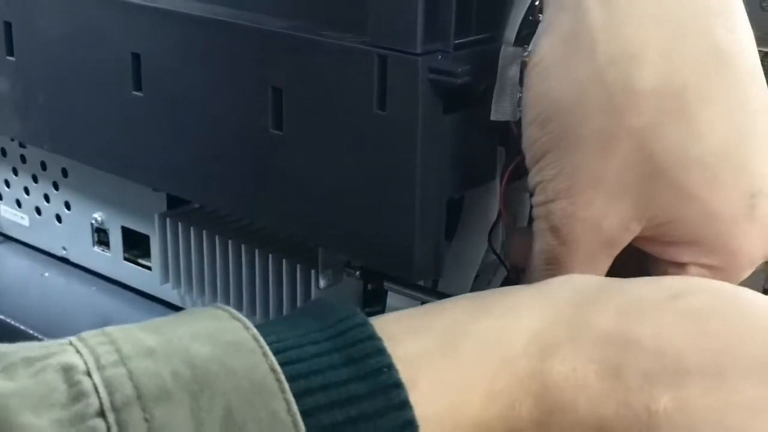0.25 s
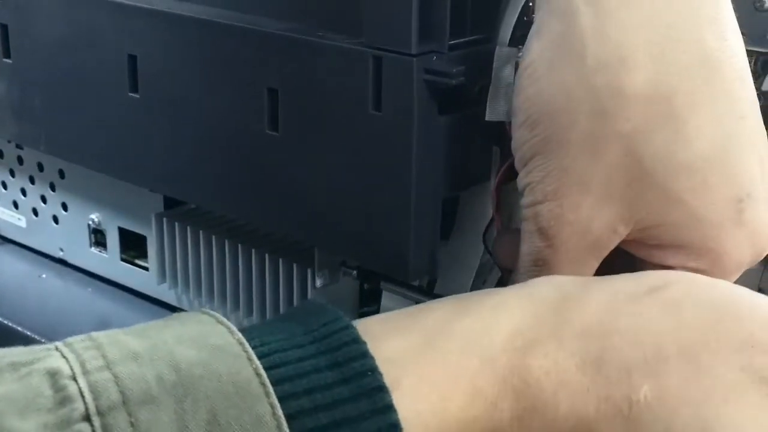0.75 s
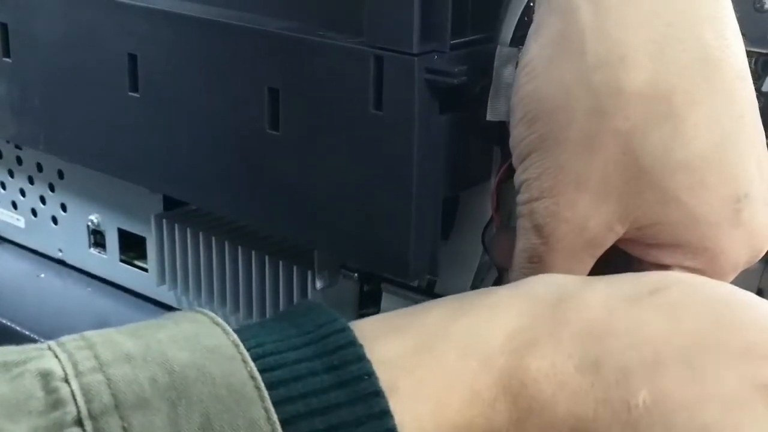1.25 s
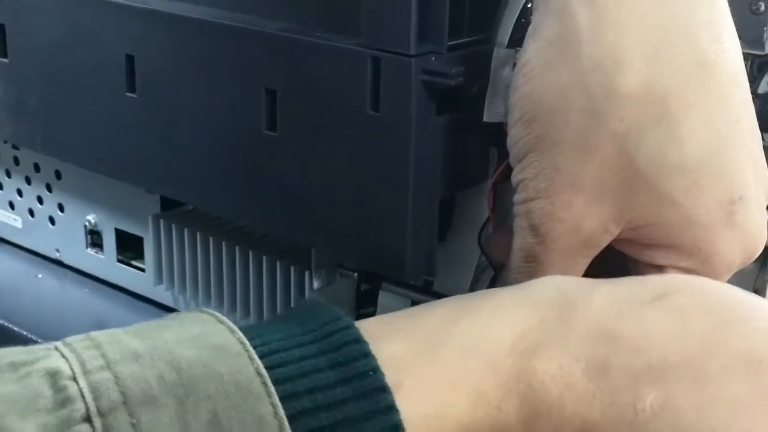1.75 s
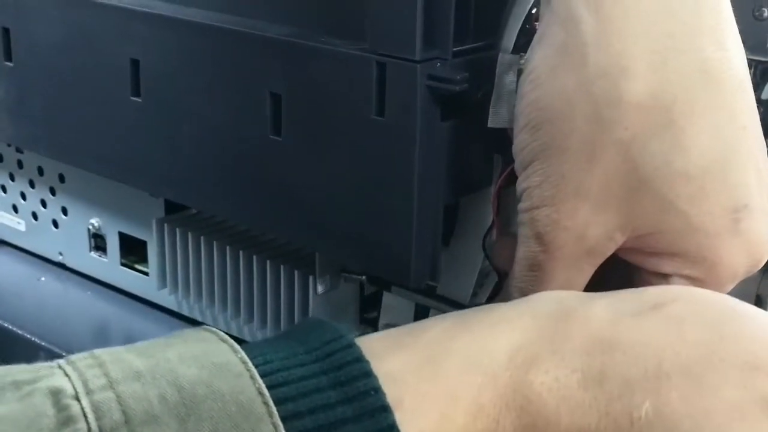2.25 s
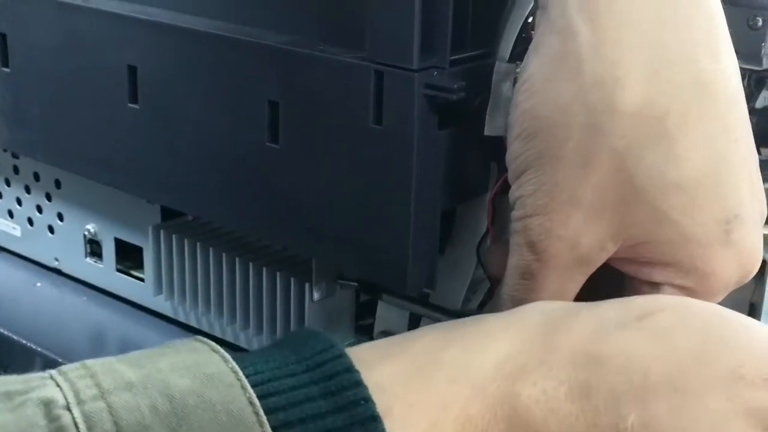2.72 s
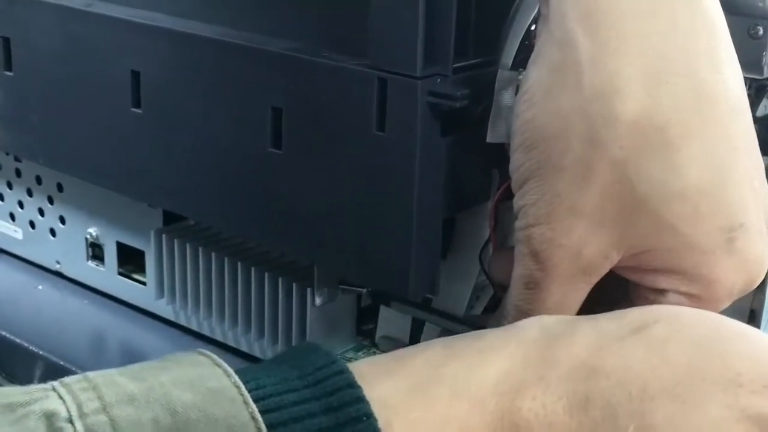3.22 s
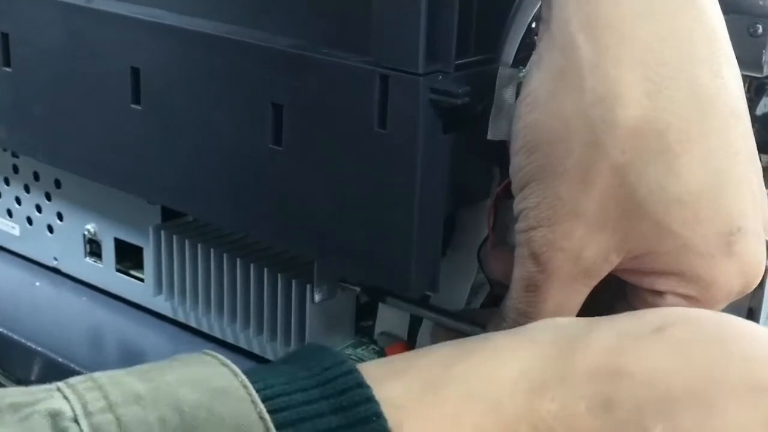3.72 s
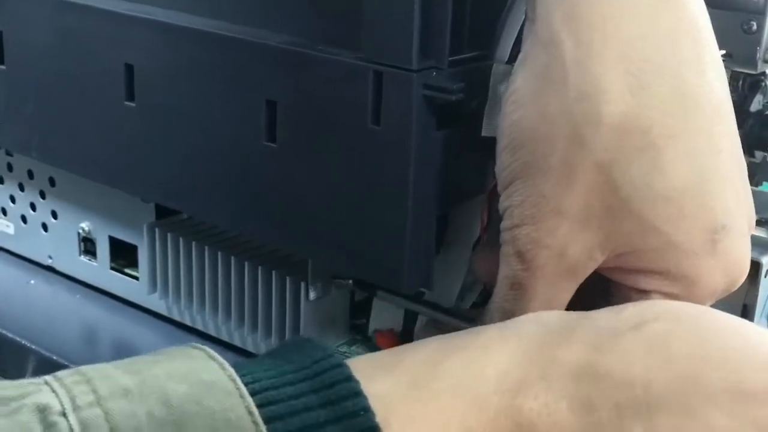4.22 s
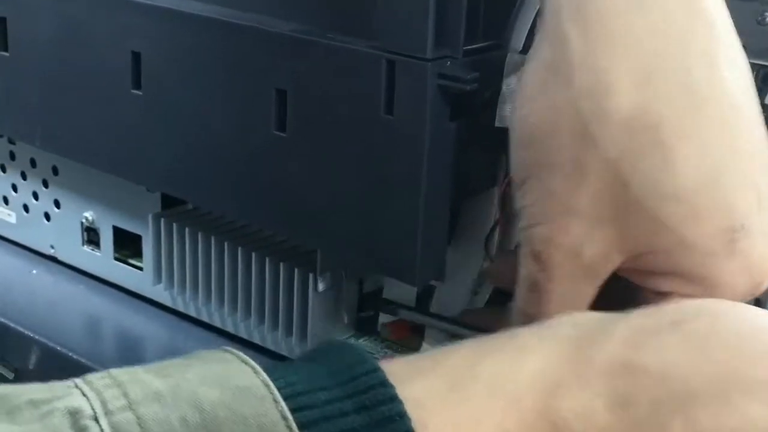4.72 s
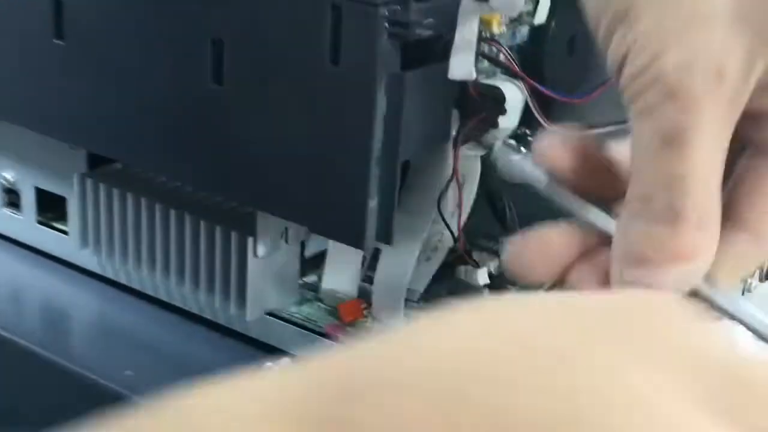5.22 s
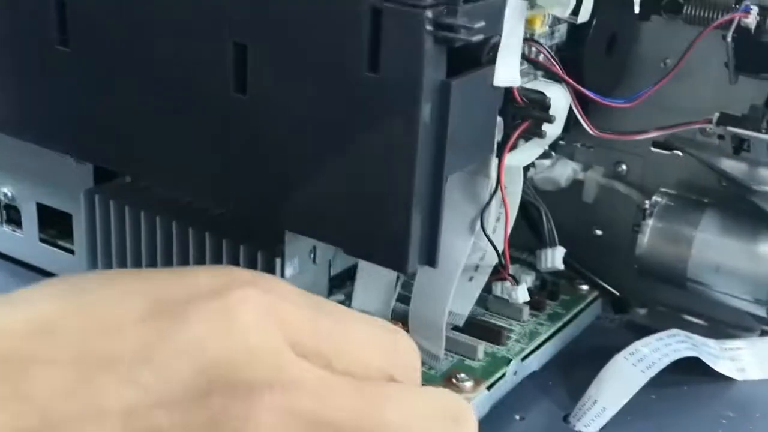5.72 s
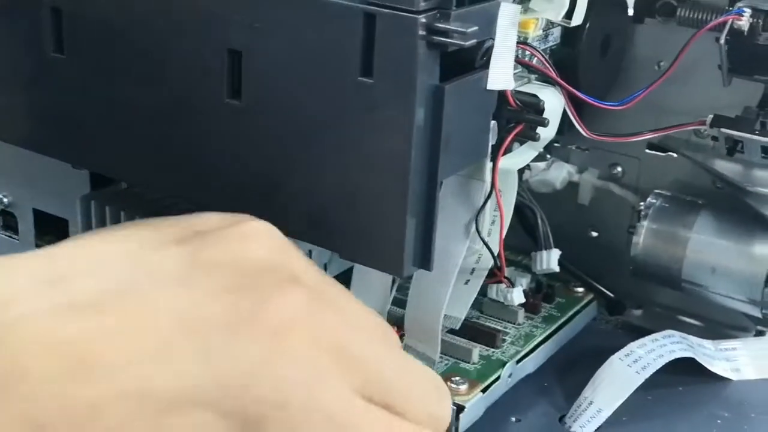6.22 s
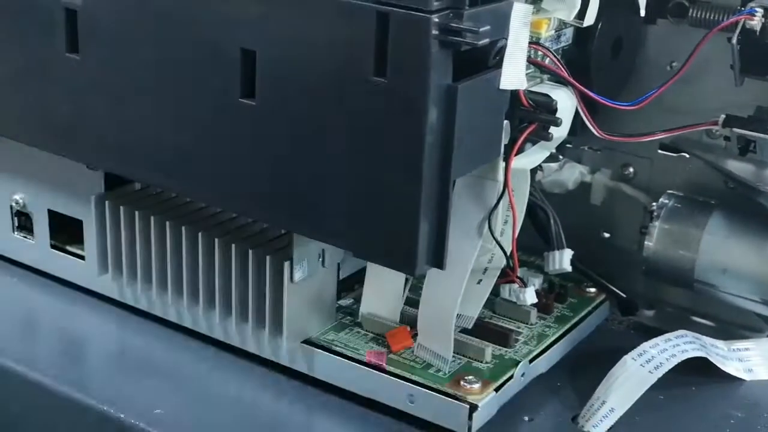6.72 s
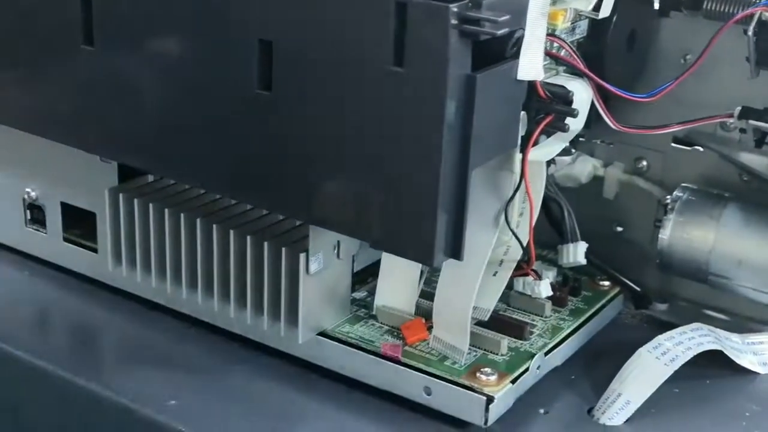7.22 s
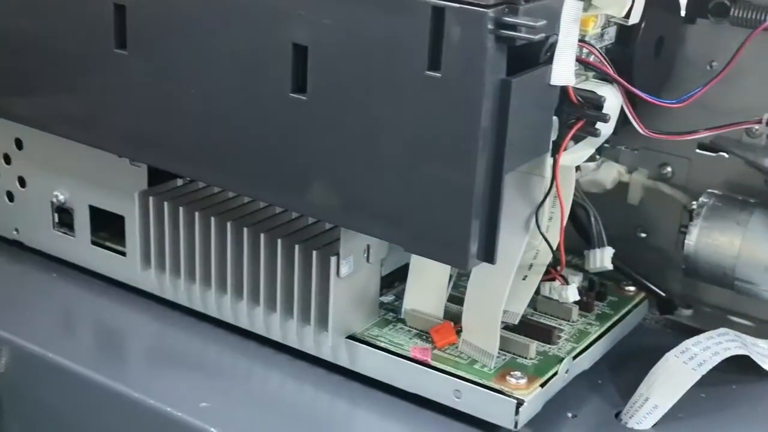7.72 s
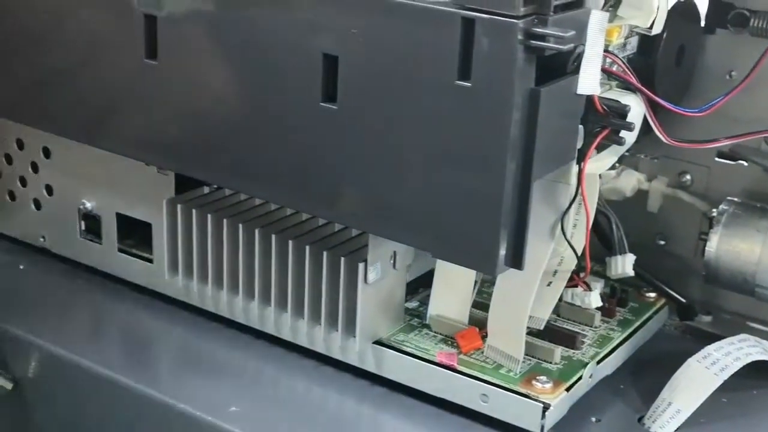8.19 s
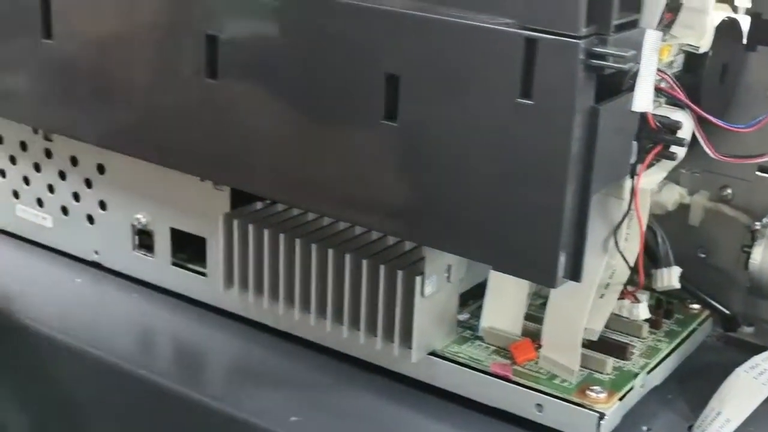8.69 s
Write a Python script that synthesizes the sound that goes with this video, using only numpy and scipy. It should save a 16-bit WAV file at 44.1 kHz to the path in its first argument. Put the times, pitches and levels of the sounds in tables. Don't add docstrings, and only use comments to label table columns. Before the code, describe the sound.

Soft rubbing and tiny screwdriver ticks on sheet steel, then a sharp metallic shaft rattle, a loud tool drop on a bench and a brief tray clatter.

```python
import sys
import numpy as np
from scipy import signal
from scipy.fft import rfft, irfft, next_fast_len
from scipy.io import wavfile
from scipy.ndimage import map_coordinates

SR = 44100
rng = np.random.default_rng(int(sys.argv[2]) if len(sys.argv) > 2 else 0)


def how_loud(loudness_db):
    steps = np.asarray(loudness_db, float) / 20
    return 10 ** steps


def persist_wave(psi):
    counts = np.round(np.clip(psi, -1, 1) * 32767).astype(np.int16)
    wavfile.write(sys.argv[1], SR, np.atleast_2d(counts).T)


N = 394694
SIZE = 2 ** 15
HZ = np.fft.rfftfreq(SIZE, 1 / SR)
T = np.arange(SIZE) / SR

# start_s, peak_level_db, panel_knock_db, steel_brightness_db, strongest_ring_hz
TIP_TICKS = [(1.6511, -48.5, -15.5, -0.5, 2160), (1.6826, -48, -37, -2.5, 2250),
             (1.707, -52.5, -31.5, -5.5, 2270), (1.734, -46, -13.5, -7.5, 2670),
             (2.0792, -51, -18.5, -14, 2580), (2.2435, -36.5, -20.5, -21.5, 1670),
             (2.335, -44.5, -22, -15, 1660), (2.4547, -43.5, -20.5, 3.5, 2400),
             (2.5041, -44.5, -22.5, -20, 2450), (2.6771, -33, -28, -10.5, 2190),
             (2.7211, -40, -21, -43, 1750), (3.2222, -40.5, -32, -18.5, 2350),
             (3.4232, -46, -17.5, -3.5, 1750), (3.492, -44.5, -34, -20.5, 2630),
             (3.5235, -41.5, -21, -18, 2700), (3.6848, -26, -15.5, -6.5, 2900),
             (4.0915, -34.5, -32.5, -15, 2600), (4.0985, -28, -21.5, -3.5, 2800),
             (4.129, -39.5, -9, -47, 2380), (4.3042, -45.5, -22.5, -5.5, 7300),
             (4.352, -44.5, -21, -16, 2400), (4.364, -32, -22, -10, 1800), (4.3846, -35, -12, -13, 2600),
             (4.6856, -45.5, -20.5, -16, 2670)]
# start_s, peak_level_db, panel_knock_db, steel_brightness_db, strongest_ring_hz
FINGER_TICKS = [(5.8719, -46, -35, -21, 2800), (6.1437, -36, -23, -5, 1950),
                (6.1521, -30, -28.5, -0.5, 2250), (7.428, -50.5, -13, -32.5, 2150),
                (7.5537, -50, -32, -17.5, 1780), (7.7706, -39.5, -38, -20.5, 3000)]
# start_s, peak_level_db, steel_brightness_db, strongest_ring_hz
THREAD_SLIPS = [(0.223, -54.5, -30.5, 850), (0.3368, -82, -29, 872), (0.354, -47.5, -28.5, 1600),
                (0.716, -53, -26.5, 1600), (0.747, -56, -18, 1700), (1.111, -49, -24, 1650),
                (1.128, -49.5, -32, 1690), (1.4892, -55.5, -15, 2470), (1.786, -52.5, -15, 2380),
                (1.8198, -52.5, -7, 2470), (2.153, -51.5, -17, 2460), (2.2227, -45.5, -17.5, 2520),
                (3.0464, -55.5, -31, 2150), (3.0621, -38.5, -11.5, 2540), (5.889, -47, -20.5, 2580)]
# start_s, peak_level_db, panel_knock_db, steel_brightness_db, strongest_ring_hz
SHAFT_RATTLE = [(4.7518, -44, -24, -17.5, 1850), (4.7656, -31.5, -36, -20.5, 1810),
                (4.7886, -41.5, -33, -16, 2520), (4.8115, -34, -38.5, -9.5, 2230),
                (4.846, -39, -22.5, -14, 4140), (4.8591, -44.5, -19.5, -15, 2100),
                (4.9212, -30.5, -35, -0.5, 7650), (4.9488, -16, -40, 1, 7600),
                (4.9513, -13, -40.5, 0, 7050), (5.0112, -23.5, -38, -5.5, 2730),
                (5.0425, -28.5, -39, -9.5, 4350), (5.0531, -17, -50, 0, 2470),
                (5.1018, -8.5, -31, -2.5, 1740), (5.142, -26, -30, -1, 2630),
                (5.1485, -17.5, -28.5, -2, 7850), (5.1749, -21.5, -33.5, -3, 1940),
                (5.1898, -32.5, -36, 4, 3000), (5.3296, -36, -18, -26, 2170),
                (5.3672, -37.5, -29.5, -17.5, 1950), (5.404, -38.5, -29, -14.5, 2100)]
# start_s, peak_level_db, panel_knock_db, steel_brightness_db, strongest_ring_hz
SHAFT_EXIT = [
    (5.2725, -16, -27, 0, 2580),
    (5.2862, -18.5, -11.5, -3, 2680),
]
# start_s, peak_level_db, panel_knock_db, steel_brightness_db, strongest_ring_hz
TOOL_DROP = [
    (7.9486, -8, 0, 0, 1860),
]
# delay_s, level_db
DROP_BOUNCES = [(0, -3), (.0006, -8), (.0032, 0), (.0043, -4), (.0066, -2), (.0095, -9), (.033, -9)]
# start_s, peak_level_db, panel_knock_db, steel_brightness_db, buzz_t60_s
TRAY_CLATTER = [(8.3473, -24.5, -18, -13, 0.23), (8.3788, -30.5, -24, -18.5, 0.036),
                (8.433, -34.5, -13, -19, 0.33), (8.4551, -30.5, -14.5, -36, 0.065),
                (8.483, -19, -8, -11.5, 0.078), (8.6029, -17.5, -24.5, -18.5, 0.11),
                (8.639, -34, -24, -36, 0.23), (8.702, -44, -23.5, -24.5, 0.33),
                (8.772, -51, -24, -10, 0.033)]

# frequency_hz, level_db (per Hz)
CHASSIS_COLOUR = [(240, -26), (400, -16.5), (994, -6.5), (1200, -7.5), (1400, -3.5), (1820, 3), (2090, -3),
                  (2670, -2.5), (3310, -7), (5030, -8), (7630, -11.5), (8760, -23.5), (14600, -44),
                  (16000, -56)]
# frequency_hz, width_hz, level_db
CHASSIS_RESONANCES = [(1200, 102, 9.5), (1606, 155, 1.5), (2540, 470, 7.5), (3996, 530, 6.5),
                      (7710, 670, 8)]
# frequency_hz, level_db (per Hz)
SHAFT_COLOUR = [(240, -76.5), (400, -20), (935, -11), (1030, -6), (1180, -8), (1870, 1), (2630, -0.5),
                (3470, -4), (6850, -5.5), (7630, -6.5), (10200, -30.5), (13700, -42), (15300, -42),
                (16000, -64)]
# frequency_hz, width_hz, level_db
SHAFT_RESONANCES = [(2700, 300, 3.12), (7650, 500, 2.4), (13200, 3870, 15.8)]
# frequency_hz, level_db, t60_s
SHAFT_RINGING = [(1780, -5.5, 0.094), (2600, -3, 0.2), (4330, -9.5, 0.083), (4440, -19.5, 0.14),
                 (5740, -9.5, 0.13), (8160, -19.5, 0.134)]
# frequency_hz, level_db (per Hz)
BENCH_COLOUR = [(240, -31.5), (400, -13.5), (490, -32), (626, -11), (893, -17), (1760, -4), (2930, -5),
                (3650, -13.5), (4300, -22), (5500, -26.5), (7800, -31), (10000, -67), (16000, -70.5)]
# frequency_hz, width_hz, level_db
BENCH_RESONANCES = [(1193, 15, 4), (1488, 47, 7.5), (1660, 50, -5), (1824, 74, 10), (2194, 115, 12),
                    (2380, 35, -1.5), (2600, 140, 9), (2920, 63, 5), (3110, 44, -1.5), (3320, 65, 4),
                    (3570, 50, 2.5), (3670, 60, 6), (3870, 34, -3), (4040, 72, -0.5)]
# pitch_hz, level_db
BENCH_NOTES = [(760, -47.5), (1167, -38), (1486, -49.5), (1763, -42), (1810, -34.5), (2152, -38.5),
               (2192, -45), (2505, -42), (2589, -41.5), (2910, -43), (2945, -43.5), (3343, -49),
               (3690, -48), (4020, -52.5)]
# frequency_hz, level_db (per Hz)
TRAY_COLOUR = [(180, -28), (300, -10.5), (634, -17), (1030, -8), (1390, -6), (1900, -10), (2170, -6),
               (2480, -6.5), (3350, -11.5), (7440, -14.5), (9390, -35.5), (14500, -58), (16000, -45.5)]
# frequency_hz, width_hz, level_db
TRAY_RESONANCES = [(1048, 23, 7.1), (1627, 125, 7.5), (1915, 32, 8.1), (2450, 170, 6.1), (2150, 82, 2.7),
                   (4240, 550, 3.4)]
# start_s, peak_level_db, pitch_hz, t60_s
FREE_RINGS = [(2.503, -57, 4300, .12), (3.188, -52, 2400, 0.1), (3.685, -41, 4300, .06),
              (4.092, -39, 4230, .06), (4.098, -37, 4230, .07), (2.243, -45, 1600, .08),
              (2.243, -46, 2500, .06), (2.678, -47, 4250, .05), (4.921, -38, 2500, .14),
              (4.921, -37, 7650, .09), (4.921, -52, 14500, .05), (4.845, -40, 4230, 0.08),
              (4.92, -41, 9650, 0.16), (4.953, -36, 5950, .3), (4.953, -35, 4350, .2),
              (5.103, -33, 6420, .06), (5.04, -38, 4350, .3), (8.347, -43, 7450, .12),
              (5.038, -37, 9640, 0.1), (4.952, -42, 4635, .5), (5.874, -64, 4635, 0.55),
              (6.151, -60, 2914, 0.9), (6.155, -50, 2320, 0.2), (8.483, -29, 5320, 0.035),
              (5.286, -27, 5130, .035), (8.347, -37, 2450, .08), (8.453, -38, 1730, .1),
              (8.603, -29, 1900, .1), (8.64, -36, 1720, .15)]
# start_s, peak_level_db, pitch_hz
HAND_THUDS = [(1.142, -56, 109), (4.133, -43.5, 109), (4.399, -45.5, 151), (4.977, -44.5, 125),
              (5.048, -41.5, 118), (5.1, -42.5, 188), (5.291, -41.5, 220.7), (5.358, -44, 187),
              (6.17, -49, 143.9), (7.59, -39, 203.3), (7.692, -47, 200.6), (7.967, -34.5, 204.4),
              (8.058, -40, 107), (8.373, -40.5, 214), (8.459, -41, 127), (8.548, -43.5, 216.5),
              (8.697, -45.5, 97.7)]
# frequency_hz, level_db
CASE_BOOM = [(60, -29.5), (200, 8), (320, 0.5), (480, -15), (900, -46.5)]

# full_from_s, hold_s, swell_s (per 20 dB), body_level_db, hiss_level_db
RUB_STROKES = [(0, 0.043, -1.5, -60, -82), (.25, 0.12, 0.2, -64.5, -95), (.65, 0.13, -0.2, -66.5, -87),
               (1.48, 0.019, 5.5, -68.5, -82.5), (1.74, .14, -2.15, -66.5, -79),
               (5.86, 0.046, 0.95, -67.5, -78), (6.57, 0.073, 0.05, -66.5, -55),
               (6.8, 0.12, 2.9, -90, -71.5), (7.35, 0.06, 0.31, -67.5, -65.5)]
# frequency_hz, width_hz, level_db
RUB_BODY_BANDS = [(861, 90, -1), (1227, 190, 0), (1600, 360, -0.5), (2400, 330, 0)]
# frequency_hz, width_hz, level_db
RUB_HISS_BANDS = [(4280, 3700, -7.5), (6030, 900, -1), (7300, 1200, -5.5)]
# full_from_s, hold_s, swell_s (per 20 dB), body_level_db, hiss_level_db
SCRAPE_STROKES = [(4.76, .1, 0.066, -54, -65), (4.96, 0.11, 0.043, -42.5, -48.5),
                  (5.11, 0.09, 0.18, -45.5, -44), (8.37, 0.35, 0.088, -60.5, -64)]
# frequency_hz, width_hz, level_db
SCRAPE_BODY_BANDS = [(1850, 350, 3.5), (2600, 450, 3), (4350, 300, -3.5)]
# frequency_hz, width_hz, level_db
SCRAPE_HISS_BANDS = [(4600, 2000, 0), (5970, 1200, -1), (7600, 380, -2), (12000, 6000, -22.5)]
# full_from_s, hold_s, swell_s (per 20 dB), whistle_level_db, hiss_level_db
SQUEAL_STROKES = [(3.5, 0.18, 0.08, -69, -72), (3.7, .14, .05, -77, -66)]
# frequency_hz, width_hz, level_db
SQUEAL_BANDS = [(5950, 380, 0), (6500, 2000, 0)]

# time_s, pitch_hz, level_db
FAR_WHINE = [(6.9, 525, -84), (6.96, 530, -68), (7.06, 530, -70), (7.1, 535, -79), (7.36, 559, -81)]
# frequency_hz, level_db (per Hz)
RUMBLE_SPECTRUM = [(12, -31.5), (20, -4.5), (53, 1), (124, -9.5), (198, -11.5), (267, -18.5), (485, -27.5),
                   (535, -37), (600, -57), (780, -25.5), (1320, -120)]
# frequency_hz, correlation (1 = same)
RUMBLE_LIKENESS = [(25, .999), (60, 0.99), (130, 1), (290, 0.636), (600, 0.14)]
# frequency_hz, level_db (per Hz)
AIR_SPECTRUM = [(210, -45.5), (350, -23), (520, -7.5), (700, -8), (1000, -4.5), (1400, -7.5), (1700, -3),
                (2200, -0.5), (2900, -3.5), (3400, -12.5), (4400, -14.5), (7500, -17), (9000, -28),
                (16000, -31.5)]
# frequency_hz, t60_s
ROOM_DECAY = [(300, 0.59), (2000, 0.36), (5000, 0.42), (12000, .25)]
# frequency_hz, level_db
PORT_BALANCE = [(60, -0.5), (130, 1), (290, -1), (640, 0.5), (1410, -4.5), (3100, -7.0), (6820, -1.5),
                (15000, 4)]


def strikes(events, colour, walls, crack_db, peak_db, wet_db, pan_db, rise_s, lag_s,
            bend=1, treble=0.58, ring_db=0, modes=(), bounces=((0, 0),)):
    bus = np.zeros((2, N))
    near = T[:SIZE // 3]
    knock, bright = np.transpose(events)[2:4]
    ports = np.exp(2j * np.pi * HZ * (np.array([[-lag_s], [0]]) - abs(lag_s)))
    high = along([(3000, 0), (4500, 0.92)], HZ)
    crack_gain = how_loud(along([(3000, 0.46), (5000, 1.1), (12000, 3.2)], HZ))
    for k, (s, db, knock_db, bright_db, ring_hz, t60) in enumerate(events):
        low_db, high_db = knock_db - knock.mean(), bright_db - bright.mean()
        tilt = along([(900, low_db), (1500, 0.0058), (3300, 0.0), (4500, high_db)], HZ)
        ripple = 1.5 * wobble(90, len(HZ)) + [2 * wobble(90, len(HZ)) for port in range(2)]
        peak = peak_db * np.exp(-((HZ / ring_hz - 1) / 0.085) ** 2)

        crack = sum(how_loud(crack_db + level) * np.exp(-2j * np.pi * HZ * (late + rise_s))
                    for late, level in bounces)
        grain = rng.standard_normal((3, SIZE)) * (1 - np.exp(-T / rise_s))
        body, steel = (rfft(how_loud(-60 * (T / np.clip(t60 * share, .01, 1)) ** bend) * grain)
                       for share in (1, treble))
        buzz = body * (1 - high) + steel * high
        shared = crack * crack_gain + 0.43 * buzz[0]
        x = irfft((shared * ports + 1.134 * buzz[1:]) * causal(colour + tilt + peak + ripple), SIZE)
        x /= np.abs(x).max()

        for hz, level, decay in modes:
            strength = how_loud(ring_db + level + np.interp(hz, HZ, tilt) + rng.normal(0, 3, (2, 1)))
            note = np.sin(2 * np.pi * (hz * near + rng.random((2, 1))))
            x[:, :len(near)] += strength * how_loud(-60 * near / decay) * note * (1 - np.exp(-near / rise_s))
        x += how_loud(wet_db) * irfft(rfft(x) * walls[k % len(walls)], SIZE)
        add(bus, s - rise_s, how_loud(db + 4.0) * x * how_loud([[pan_db / 2], [-pan_db / 2]]))
    return bus


def held(events, t60, longer_per_db):
    middle_db = np.mean([row[1] for row in events])
    return [(*row, t60 * np.exp(longer_per_db * (row[1] - middle_db))) for row in events]


def resonant(colour, peaks):
    return along(colour, HZ) + sum(db * np.exp(-((HZ - hz) / width) ** 2) for hz, width, db in peaks)


def screw_ticks(walls):
    return strikes(held(TIP_TICKS + FINGER_TICKS, 0.095, 0.028),
                   resonant(CHASSIS_COLOUR, CHASSIS_RESONANCES), walls,
                   crack_db=16, peak_db=7.5, wet_db=-11.5, pan_db=0.6, rise_s=0.0019, lag_s=-.0001)


def thread_slips(walls):
    events = [(s, db, -1.5 * bright, bright, hz) for s, db, bright, hz in THREAD_SLIPS]
    return strikes(held(events, 0.18, -0.053), resonant(CHASSIS_COLOUR, CHASSIS_RESONANCES), walls,
                   crack_db=-31, peak_db=6, wet_db=-15, pan_db=-0.5, rise_s=0.015, lag_s=0.000639, bend=1.32)


def shaft_knocks(walls):
    rattle = strikes(held(SHAFT_RATTLE, 0.099, -0.026), resonant(SHAFT_COLOUR, SHAFT_RESONANCES), walls,
                     crack_db=12.5, peak_db=8.5, wet_db=-10.0, pan_db=-0.5, rise_s=.002, lag_s=-0.00011,
                     ring_db=-25.0, modes=SHAFT_RINGING)
    leaving = strikes(held(SHAFT_EXIT, 0.063, 0), resonant(SHAFT_COLOUR, SHAFT_RESONANCES[:2]), walls,
                      crack_db=10, peak_db=5, wet_db=-11, pan_db=1.0, rise_s=0.0014, lag_s=-0.000133)
    return rattle + leaving


def tool_drop(walls):
    return strikes(held(TOOL_DROP, 0.71, 0), resonant(BENCH_COLOUR, BENCH_RESONANCES), walls,
                   crack_db=33.0, peak_db=-2.0, wet_db=-21.5, pan_db=-1.5, rise_s=0.0009, lag_s=.0001,
                   bend=1.334, treble=1.0, bounces=DROP_BOUNCES)


def tray_clatter(walls):
    tray_hz = 1850
    events = [(*row, tray_hz, t60) for *row, t60 in TRAY_CLATTER]
    return strikes(events, resonant(TRAY_COLOUR, TRAY_RESONANCES), walls,
                   crack_db=18, peak_db=8.5, wet_db=-13.0, pan_db=0.0, rise_s=0.00147, lag_s=0.0005945)


def rings():
    bus = np.zeros((2, N))
    bench_t60_s = .5
    bench = [(TOOL_DROP[0][0], db, hz, bench_t60_s) for hz, db in BENCH_NOTES]
    for s, db, hz, t60 in FREE_RINGS + bench:
        flutter_db = 3 * wobble(30, SIZE)
        note = np.sin(2 * np.pi * (hz * T + rng.random((2, 1)) / 4))
        add(bus, s, how_loud(db + flutter_db - 60 * T / t60) * (1 - np.exp(-T / .003)) * note)
    return bus


def thuds():
    bus = np.zeros((2, N))
    t60_s, rise_s = 0.23, 0.016
    for s, db, hz in HAND_THUDS:
        note = np.sin(2 * np.pi * hz * T) + .5 * np.sin(2 * np.pi * hz * .62 * T)
        noise = rng.standard_normal(SIZE) + 0.55 * rng.standard_normal((2, SIZE))
        puff = unit(irfft(rfft(noise) * how_loud(along(CASE_BOOM, HZ)), SIZE))
        add(bus, s - .005, how_loud(db - 60 * T / t60_s) * (1 - np.exp(-T / rise_s)) * (note + how_loud(-5.5) * puff))
    return bus


def friction(strokes, column, peaks, grainy_db, stop):
    t = np.arange(N) / SR
    level = 0
    for s, hold, swell, *dbs in strokes:
        away_s = np.maximum(0, np.maximum(s - t, (t - s - hold) / stop))
        level = level + how_loud(dbs[column] - 20 * away_s / max(swell, .01))

    def voiced(f):
        return sum((-1) ** k * how_loud(db) * 1j * f * w / (c * c - f * f + 1j * f * w)
                   for k, (c, w, db) in enumerate(peaks))

    grains = how_loud(grainy_db * wobble(1200, N)) * rng.standard_normal((2, N))
    return level * unit(filtered(grains, lambda f: voiced(f) ** 2))


def rubs():
    body = friction(RUB_STROKES, 0, RUB_BODY_BANDS, grainy_db=2, stop=0.11)
    hiss = friction(RUB_STROKES, 1, RUB_HISS_BANDS, grainy_db=1.0, stop=0.11)
    return body + hiss * how_loud([[-2.5], [2.5]])


def scrapes():
    body = friction(SCRAPE_STROKES, 0, SCRAPE_BODY_BANDS, grainy_db=2, stop=0.84)
    hiss = friction(SCRAPE_STROKES, 1, SCRAPE_HISS_BANDS, grainy_db=2, stop=0.84)
    return body + hiss * how_loud([[1.5], [-1.5]])


def squeal():
    whistle = friction(SQUEAL_STROKES, 0, SQUEAL_BANDS[:1], grainy_db=1.2, stop=3.5)
    return whistle + friction(SQUEAL_STROKES, 1, SQUEAL_BANDS[1:], grainy_db=1.2, stop=3.5)


def whine():
    hz = curves(FAR_WHINE, outside=None)[0]
    db = curves(FAR_WHINE, outside=-150)[1]
    phase = 2 * np.pi * np.cumsum(hz + 14 * wobble(400, N)) / SR
    flutter_db = 3 * wobble(260, N)
    return how_loud(db + 4 + flutter_db) * np.sin([phase - 1.1, phase + 1.0])


def shop():
    rumble_db = -57 + 0.34 * wobble(30, N)
    rumble = how_loud(rumble_db) * pair(RUMBLE_SPECTRUM, RUMBLE_LIKENESS, lag_s=0)
    air_db = -64.5 + 0.523 * wobble(68, N) + 0.87 * wobble(0.9, N)
    air = how_loud(air_db) * pair(AIR_SPECTRUM, [(500, 0.6), (3000, 0.2), (8000, 0.1)], lag_s=.0006)
    return rumble + air


def pair(spectrum, alike, lag_s):
    def shares(hz):
        turn = np.arccos(np.clip(along(alike, hz), -1, 1)) / 2
        return how_loud(along(spectrum, hz)) * [np.cos(turn), np.sin(turn)]

    mid, side = filtered(rng.standard_normal((2, N)), shares)
    return unit(np.array([np.roll(mid + side, round(lag_s * SR)), mid - side]))


def tails(count):
    noise = rng.standard_normal((count, 2, SIZE * 3 // 4))
    hz, t, z = signal.stft(noise, SR, nperseg=256)
    tail = signal.istft(z * how_loud(-60 * t / along(ROOM_DECAY, hz)[:, None]), SR, nperseg=256)[1]
    tail *= np.clip(T[:tail.shape[2]] / 0.0074, 0, 1)
    return rfft(tail / np.linalg.norm(tail[0, 0]), SIZE)


def unit(x):
    return x / np.sqrt(np.mean(x ** 2) + 1e-20)


def along(points, hz):
    f, v = np.transpose(points)
    return np.interp(np.log(hz + 1), np.log(f + 1), v)


def curves(rows, outside):
    s, *cols = np.transpose(rows)
    return [np.interp(np.arange(N) / SR, s, c, outside, outside) for c in cols]


def wobble(knots, size):
    return map_coordinates(rng.standard_normal(int(knots) + 4), [np.linspace(0, knots, size)])


def filtered(x, response):
    m = next_fast_len(N + 8192)
    return irfft(rfft(x, m) * response(np.fft.rfftfreq(m, 1 / SR)), m)[..., :N]


def causal(db):
    cepstrum = irfft(np.log(how_loud(np.maximum(db, -120))), SIZE)
    cepstrum[..., 1:SIZE // 2] *= 2
    cepstrum[..., SIZE // 2 + 1:] = 0
    return np.exp(rfft(cepstrum))


def add(bus, s, x):
    part = bus[:, round(s * SR):][:, :x.shape[1]]
    part += x[:, :part.shape[1]]


def scene():
    walls = tails(count=9)
    contacts = screw_ticks(walls) + thread_slips(walls) + shaft_knocks(walls)
    contacts += tool_drop(walls) + tray_clatter(walls)
    ringing = rings() + thuds()
    sliding = rubs() + scrapes() + squeal()
    return contacts + ringing + sliding + whine() + shop()


def band_limit(x):
    return signal.sosfilt(signal.butter(12, 16480, fs=SR, output="sos"), x)


def record(dry):
    def response(hz):
        return how_loud(along(PORT_BALANCE, hz) * np.array([[.5], [-.5]])) * (hz < 16300)

    mix = np.clip(filtered(dry, response), -1, 1)
    return band_limit(mix)


dry = scene()
out = record(dry)
persist_wave(out)
```